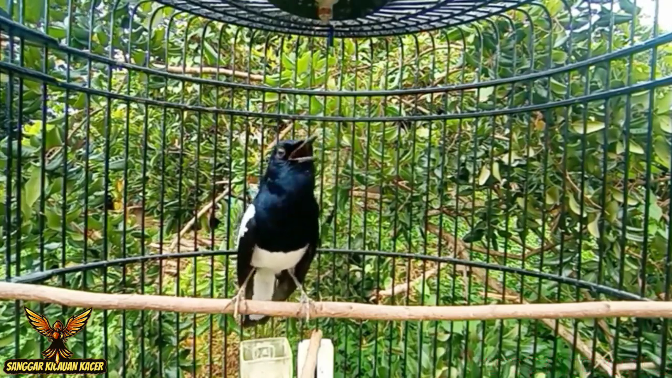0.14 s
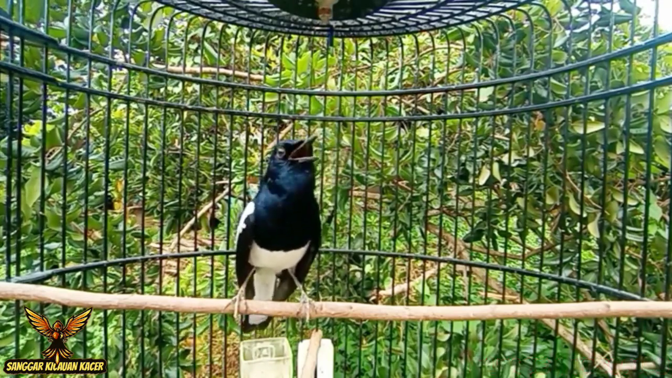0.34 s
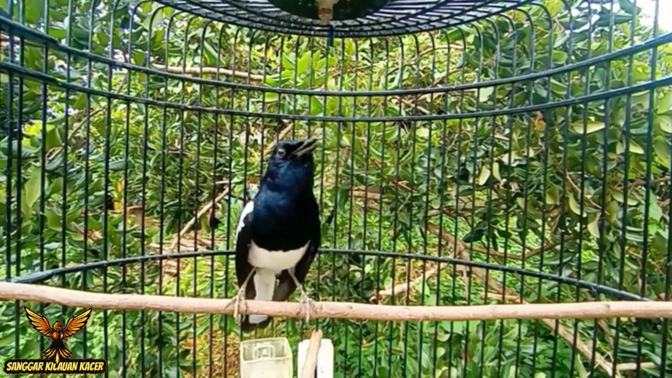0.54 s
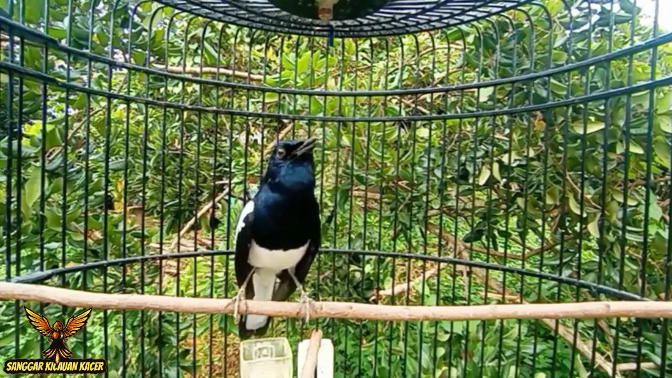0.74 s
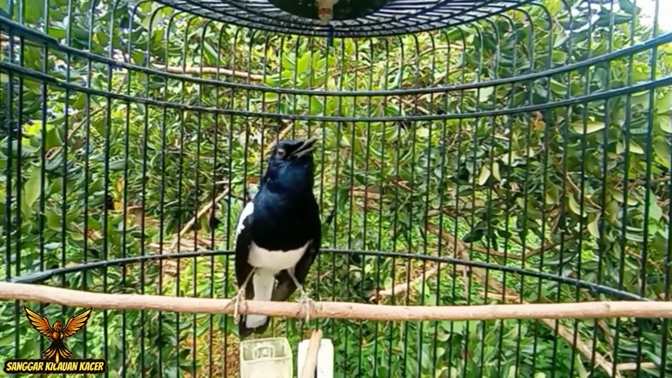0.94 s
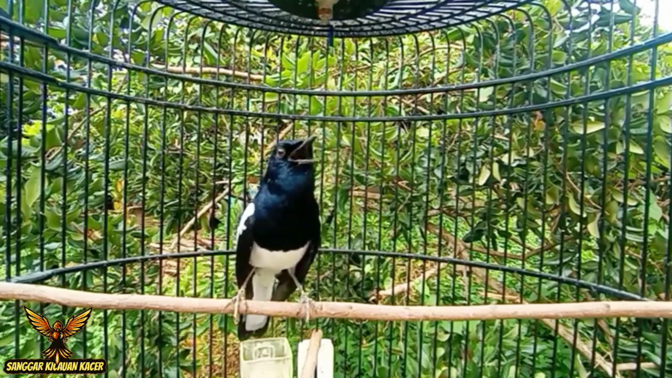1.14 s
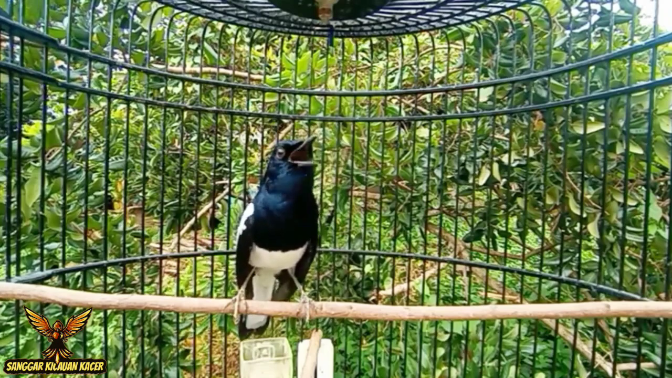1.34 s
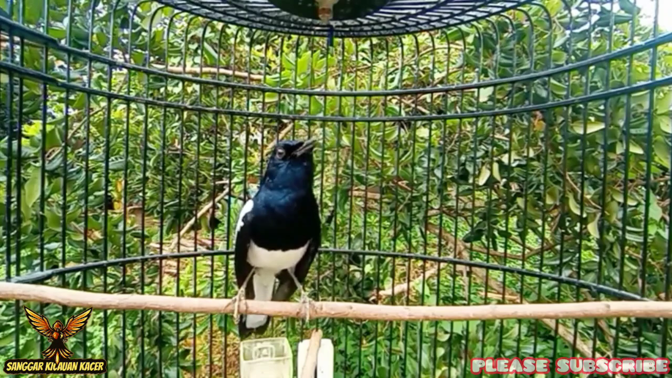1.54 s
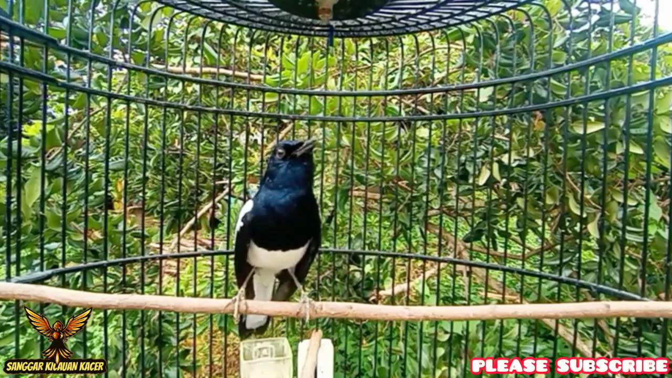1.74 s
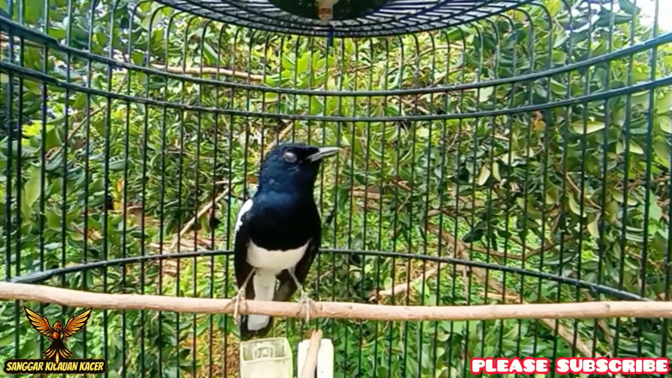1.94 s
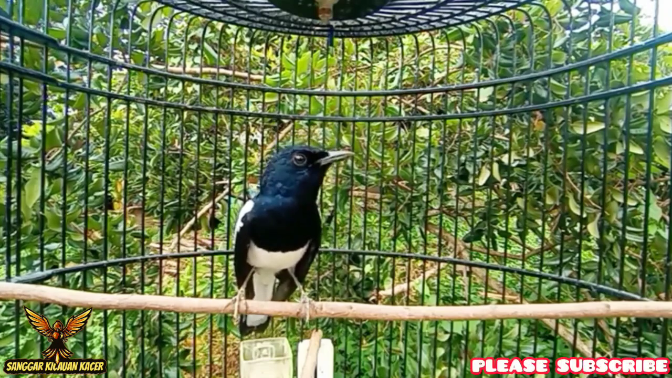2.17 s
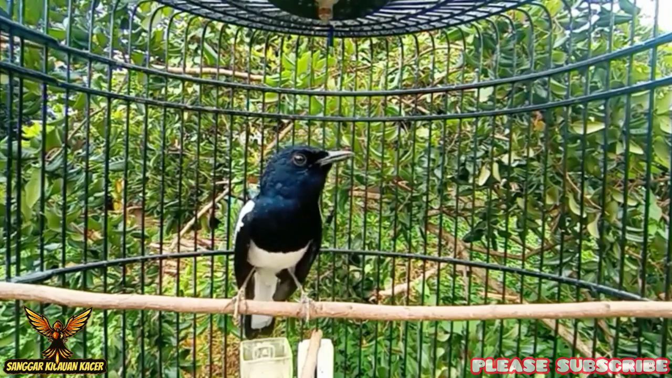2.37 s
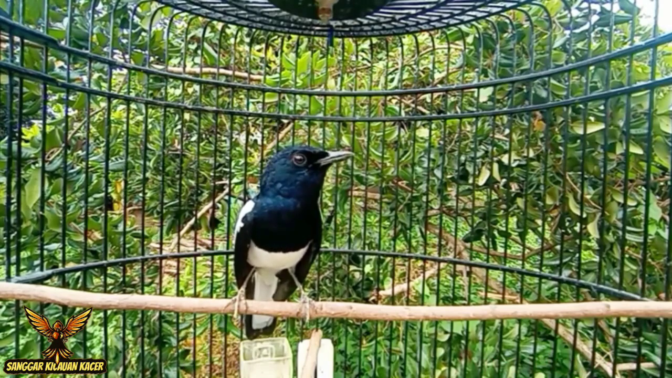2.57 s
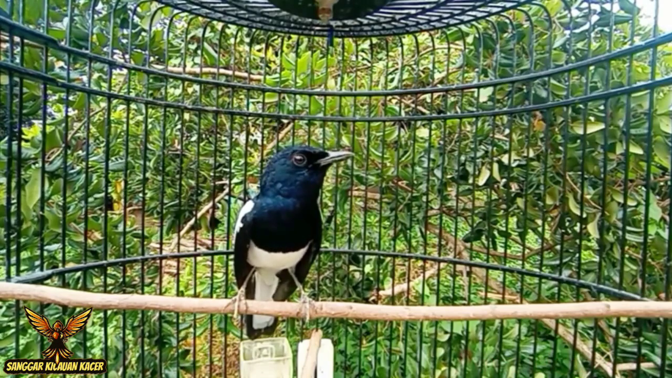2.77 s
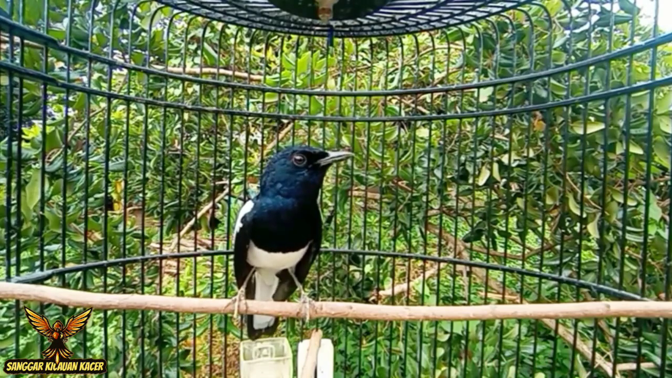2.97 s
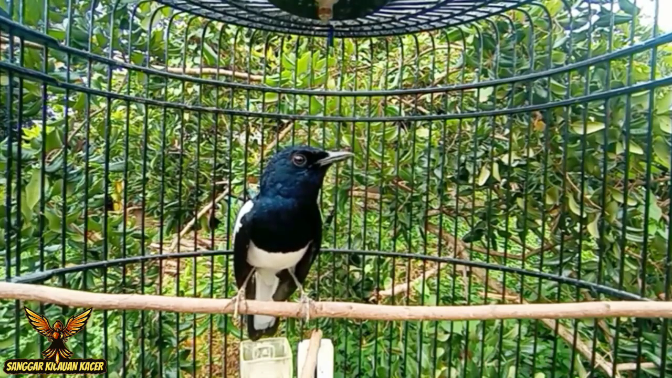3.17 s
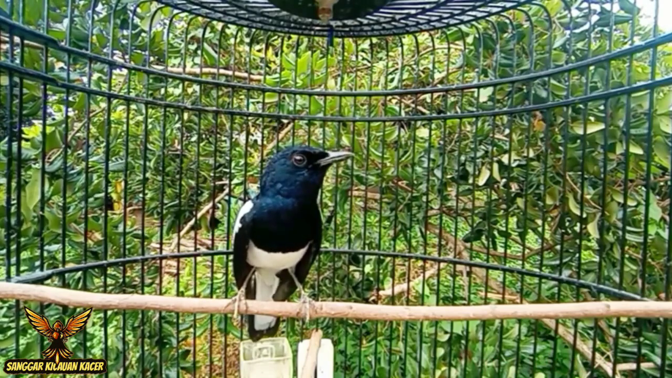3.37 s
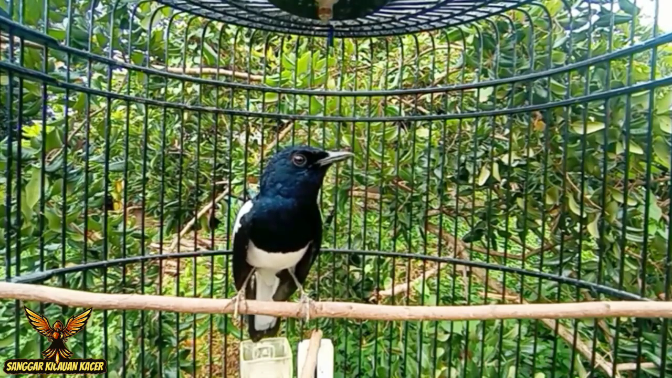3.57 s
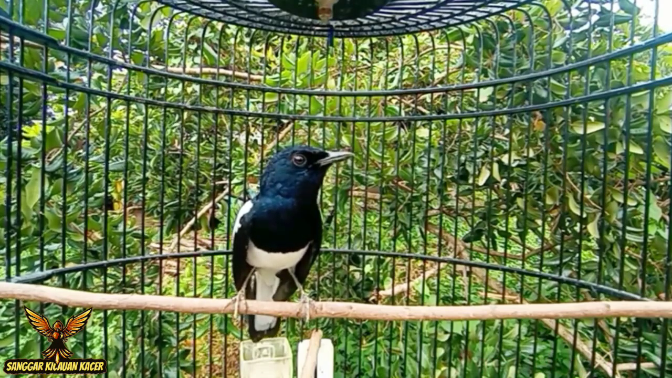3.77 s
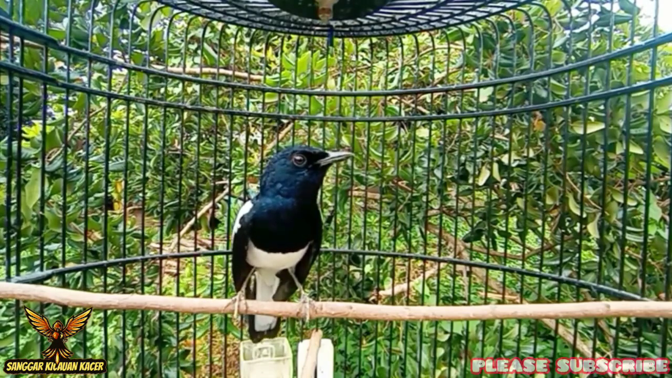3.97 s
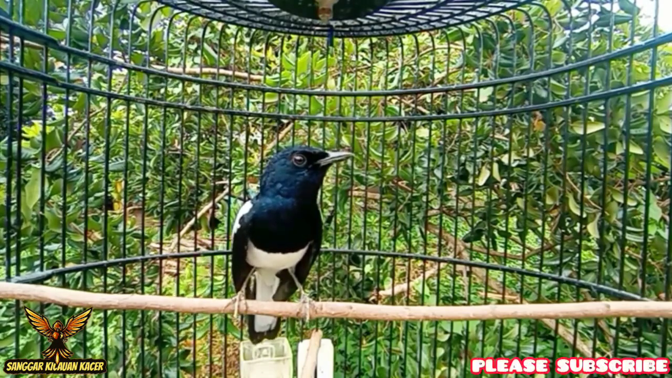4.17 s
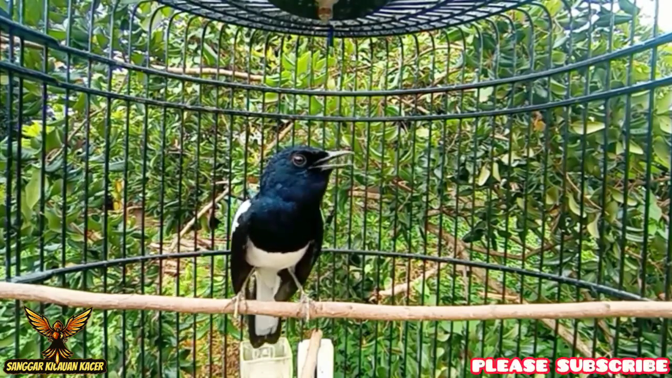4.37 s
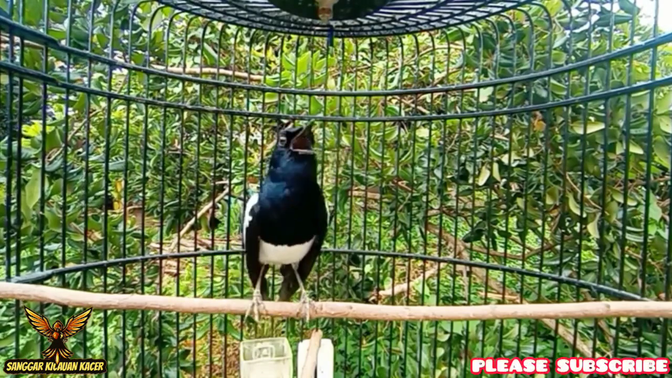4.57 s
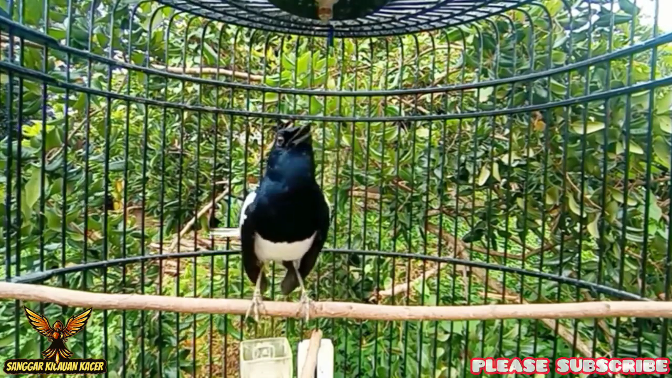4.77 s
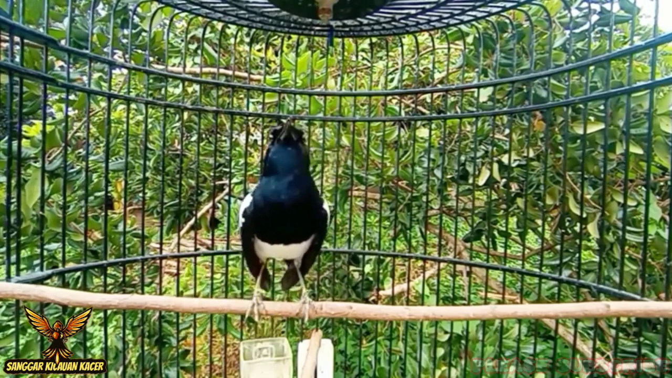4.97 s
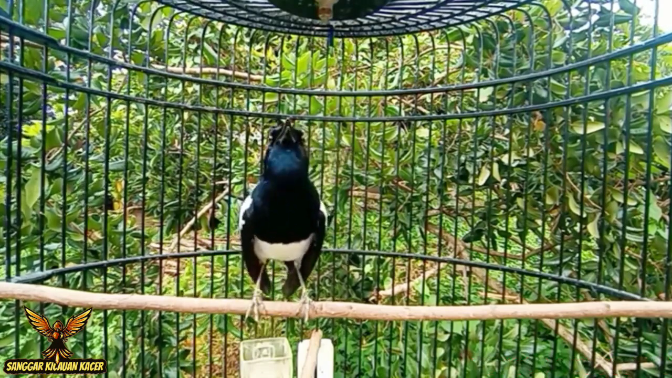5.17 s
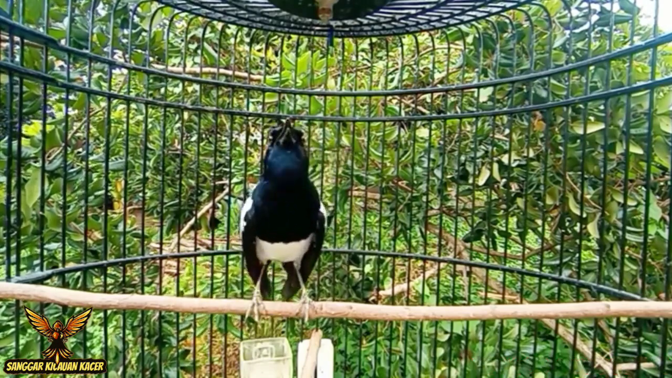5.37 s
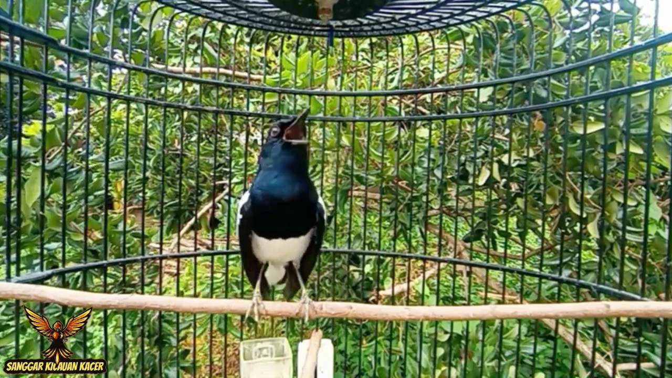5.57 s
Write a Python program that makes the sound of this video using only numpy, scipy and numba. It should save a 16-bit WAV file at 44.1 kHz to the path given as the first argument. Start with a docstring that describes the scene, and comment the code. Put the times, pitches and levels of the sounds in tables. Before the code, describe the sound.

A caged songbird sings loud sliding whistles and raspy chips close by, pausing between two phrases, over faint garden rumble and other birds.

```python
"""A caged songbird sings close to a phone microphone, over a garden's soft rumble and insect-like drone.
It opens with four whistles, the last ending in a trill, and gives a harsh chip just after 2 s.
Then it rests, and other birds are heard answering from further off. From 4.3 s it sings a second,
raspier phrase, and the drone swells briefly. Its voice box (the syrinx) makes the tone and its throat
shapes the overtones. All along, the recorder turns its gain down under the loud notes."""
import sys
import numpy as np
from scipy import signal
from scipy.fft import rfft, irfft, next_fast_len
from scipy.io import wavfile
from scipy.ndimage import uniform_filter1d
from numba import njit

SR = 44100
rng = np.random.default_rng(int(sys.argv[2]) if len(sys.argv) > 2 else 0)


def wrap_up_sound(samples):
    """Save the sound to the file named by the first command line argument, as 16-bit audio."""
    columns = np.atleast_2d(samples).T
    # keep every value between -1 and 1, then stretch to whole-number steps
    tamed = np.clip(columns, -1, 1)
    steps = np.round(tamed * 32767).astype(np.int16)
    wavfile.write(sys.argv[1], SR, steps)


N = 247842

# Tone colour of the garden noise: f/Hz, level/dB
GARDEN_SPECTRUM = [(20, -36.5), (35, -23.5), (50, -18), (90, -3.5), (200, -14), (500, -16.5), (1000, -17.5),
                   (2000, -24.5), (3200, -17.5), (4500, -12.5), (6000, -22.5), (16000, -44.5)]
# How the background rises and falls: t/s, rumble level/dB, drone level/dB
BACKGROUND_LEVELS = [(0, -50.5, -57.5), (0.301, -56, -62), (0.618, -51.5, -58.5), (1.001, -54, -55.5),
                     (1.399, -54, -51), (1.699, -59, -71), (2.102, -60, -70), (2.452, -61, -71),
                     (3.698, -61, -74), (4.15, -61, -78.5), (4.399, -55, -40), (4.801, -57.5, -71),
                     (5.62, -59, -67.5)]
# Ringing bands of the drone: f/Hz, width/Hz, relative level/dB
DRONE_BANDS = [(1287, 160, 3), (2106, 140, -5), (2730, 270, -1), (3203, 810, -6), (4050, 140, -9.5),
               (5640, 70, -17.5), (7100, 70, -20)]
# Gliding calls of far birds; the rows from 2.558 to 2.63 s are overtones riding above the 2.23.2 kHz glide:
# start t/s, end t/s, start f/Hz, end f/Hz, relative level/dB
DISTANT_CALLS = [(1.779, 1.87, 4210, 4135, -65.5), (1.844, 2.026, 4033, 3973, -60.5),
                 (2.491, 2.662, 5480, 3760, -73.5), (2.532, 2.586, 2190, 2196, -67),
                 (2.584, 2.666, 2183, 3200, -66.5), (2.558, 2.589, 6550, 6750, -71),
                 (2.585, 2.61, 6750, 7530, -69.5), (2.589, 2.63, 4540, 5450, -65.5),
                 (2.953, 2.982, 1920, 2500, -60.5), (3.007, 3.166, 2620, 2300, -65.5),
                 (3.188, 3.232, 1720, 2000, -69.5), (3.312, 3.488, 1899, 1880, -67.5),
                 (3.367, 3.414, 3140, 3600, -56), (3.564, 3.624, 4040, 4125, -57.5),
                 (3.606, 3.653, 3710, 3150, -58), (3.792, 3.831, 2927, 3150, -61),
                 (3.826, 3.871, 3113, 4000, -56), (3.871, 3.924, 3930, 3900, -59.5),
                 (3.972, 3.982, 4310, 3150, -53), (4.028, 4.031, 3770, 3140, -54)]
# A second bird nearby, one list for each whistle: t/s, f/Hz, level/dB
NEIGHBOUR_WHISTLES = [
    [(0.145, 4320, -38.5), (0.165, 3810, -31), (0.195, 3850, -34.5), (0.205, 3350, -34),
     (0.215, 3750, -34.5), (0.235, 3280, -32.5)],
    [(0.33, 3070, -25.5), (0.395, 4090, -31), (0.405, 5000, -44.5), (0.415, 5260, -34)],
    [(0.72, 4000, -35.5), (0.755, 3750, -34), (0.79, 3150, -42.5)],
    [(0.9, 2980, -48), (0.93, 3280, -49.5), (0.949, 3890, -40.5), (0.98, 4020, -51.5)],
    [(2.655, 3362, -46.5), (2.84, 3322, -42), (2.86, 3370, -50.5)],
    [(3.241, 2530, -41.5), (3.26, 2290, -47), (3.283, 2230, -48), (3.312, 2520, -45.5), (3.33, 2894, -43),
     (3.343, 2714, -47.5), (3.354, 3082, -43.5), (3.542, 3045, -42.5), (3.57, 3040, -47.5)],
    [(3.625, 2750, -48.5), (3.669, 2510, -43), (3.82, 2170, -55.5)],
    [(3.83, 1770, -59.5), (3.85, 2263, -46), (3.92, 2307, -45.5), (3.986, 2016, -52), (4.0, 2010, -71)],
    [(4.163, 4050, -54), (4.206, 3910, -40), (4.219, 3050, -47), (4.23, 3290, -38.5), (4.243, 2970, -61.5)],
    [(4.39, 3080, -31), (4.423, 3680, -31.5), (4.452, 4130, -26.5)],
]
# The tops of quick up-and-down flicks in pitch: t/s, f/Hz, level/dB
FLICK_TOPS = [(0.489, 4680, -35), (0.536, 3910, -37.5), (4.558, 4426, -27.5), (4.607, 3640, -31.5)]
# Two short low tones under the second phrase, one list each: t/s, f/Hz, level/dB
LOW_WHISTLES = [
    [(4.325, 1133, -43), (4.39, 1112, -32)],
    [(4.43, 729, -43), (4.485, 697, -53)],
]
# The songbird's harsh moments: start t/s, length/s, air level/dB, shake/share of pitch
HARSH_MOMENTS = [(0.009, 0.034, -43, 0.024), (0.064, 0.15, -56, 0.0068), (1.236, 0.073, -52, 0.024),
                 (2.167, 0.064, -34.5, 0.081), (2.236, 0.0827, -18, 0.041), (2.953, 0.063, -47.5, 0.022),
                 (4.269, 0.066, -26.5, 0.12), (4.711, 0.11, -26.5, 0.024), (4.957, 0.033, -27, 0.097),
                 (5.207, 0.079, -35, 0.023), (5.554, 0.064, -63, 0.0096), (5.578, 0.018, -29.5, 0.021)]
# Tone colour of its raspy air: f/Hz, level/dB
RASP_SPECTRUM = [(600, -32), (1000, -24.5), (1500, -5), (2700, 6.5), (4000, -1), (7000, -13), (8500, -48),
                 (9600, -32.5), (11500, -22), (13000, -32.5), (15000, -20.5), (15800, -25)]
# Trills, runs of quick dips in pitch: start t/s, end t/s, dips per second, exponent of the swell,
# then at the deepest dip: pitch drop/Hz, base tone change/dB, overtone change/dB
TRILL_DIPS = [(1.16, 1.271, 54, 1.1, 720, -17, -4), (1.271, 1.308, 80, .6, 260, -3, 0),
              (2.164, 2.226, 67, .4, 1000, -9, -3), (2.244, 2.3, 57, .6, 400, 4, 8)]
# How often the syrinx slips shut, faster and then slower: t/s, slips per second
SLIP_RATES = [(5.2158, 180), (5.23, 215), (5.242, 305), (5.2535, 140), (5.267, 118)]
# Tone colour of harmonics 3 and up (harmonic k sounds at k times the pitch): f/Hz, level/dB
UPPER_SPECTRUM = [(3500, 26.5), (5000, 3), (7000, -7), (8200, -14.5), (9200, 1.5), (10300, -3), (11500, -3),
                  (13000, -13.5), (14800, -13), (16000, -16.5)]
# Strength of harmonics 3 to 9 at the syrinx: relative level/dB
HARMONIC_LEVELS = [-4.5, 1.5, -7.5, -7, -7, -9.5, -5]
# The song, one entry a note; the two sides of the syrinx overlap in the harsh chip. Columns:
# second harmonic level/dB and upper harmonics level/dB (both relative, at start, middle and end),
# then the note's path: t/s, f/Hz, level/dB at the syrinx
SONG_NOTES = [ ((-6, -2.5, -20.5), (-25, -21, -8), [(0.002, 3376, 4.5), (0.01, 3140, -4),
              (0.028, 3133, -17.5), (0.046, 3430, 3), (0.06, 3240, 8), (0.083, 3106, 7), (0.098, 2920, 0.5),
              (0.115, 2858, 4), (0.123, 2740, 1.5), (0.131, 2520, -20.5)]), ((-5, -14, -15),
              (-12.5, -10.5, -6.5), [(0.232, 3054, -24), (0.259, 2776, -3.5), (0.303, 2697, 4.5),
              (0.434, 2428, -6.5), (0.47, 2376, -9.5), (0.48, 2498, -10), (0.492, 2350, -14.5)]),
              ((-19.5, -22, -11), (-15.5, -12, -2), [(0.652, 1972, -26.5), (0.666, 1988, -5),
              (0.692, 1946, 5), (0.746, 1918, 6), (0.846, 2094, 7.5), (0.869, 2258, -2.5),
              (0.887, 2296, -1), (0.897, 2295, -14.5)]), ((-10, -11, -11), (-13, -9.5, -13.5),
              [(0.984, 2930, -32.5), (0.994, 2738, -11), (1.011, 2749, 0), (1.058, 2700, 4.5),
              (1.13, 2750, 5), (1.141, 2784, 8), (1.146, 2685, 4), (1.16, 2652, 5.5), (1.2, 2752, -2),
              (1.236, 2836, -4.5), (1.253, 3163, -6.5), (1.28, 3175, -5.5), (1.3, 3353, -8),
              (1.309, 3033, -15.5)]), ((-3, -12, -13), (-39, -23.5, -27.5), [(2.165, 1298, -40.5),
              (2.178, 1917, -30), (2.197, 1934, -24), (2.208, 2240, -27)]), ((-14.5, -12, -1.5),
              (-30, -29, -18), [(2.174, 3003, -27.5), (2.196, 3150, -20.5), (2.211, 3650, -13),
              (2.226, 2850, -28.5), (2.232, 2610, -19), (2.243, 2713, -13.5), (2.252, 1778, -19),
              (2.26, 1823, -21.5), (2.282, 1776, -11), (2.299, 1440, -9), (2.314, 1244, -29.5)]),
              ((-20, -29.5, -36.5), (-35, -44, -42), [(2.375, 1364, -65.5), (2.382, 1440, -44),
              (2.402, 1644, -33.5), (2.418, 1576, -35), (2.433, 1174, -44), (2.445, 1250, -56)]),
              ((-2, -0.59, -0.15), (-15, -9, -5.5), [(4.28, 1239, -28), (4.296, 1292, -17.5),
              (4.309, 1330, -6), (4.317, 2130, -4), (4.332, 2320, -15.5), (4.372, 2369, 0),
              (4.438, 2316, -0.5), (4.457, 2427, -7), (4.468, 2494, -2.5), (4.53, 2804, 0.5),
              (4.552, 2868, 1), (4.56, 2760, -4), (4.568, 2540, -36)]), ((-2, -5.5, -7), (-17, -13, -16),
              [(4.712, 1283, -23), (4.723, 1762, -22), (4.731, 1226, -14.5), (4.736, 1908, -12),
              (4.742, 3090, -2.5), (4.747, 3686, -5.5), (4.755, 2587, 0.5), (4.774, 1843, -5),
              (4.79, 1734, -1), (4.795, 1780, -17), (4.799, 1563, -3), (4.822, 1543, -40)]),
              ((-5.5, -10.5, -13), (-23, -4, -5), [(4.951, 2370, -36.5), (4.968, 2043, -11),
              (4.98, 1936, -26), (4.987, 2855, -4), (4.991, 2840, -8), (4.997, 2820, 3),
              (5.017, 2964, -1.5), (5.032, 2786, -11), (5.049, 2756, 1), (5.062, 2285, 2),
              (5.085, 2295, -0.5), (5.098, 2400, -2), (5.147, 2350, -9), (5.163, 2246, -23)]),
              ((-11, -3.5, -8), (-22, -3.7, -2.1), [(5.178, 2190, -24), (5.205, 2072, -8),
              (5.228, 2083, -4), (5.241, 2100, -3.5), (5.253, 2324, -0.5), (5.298, 2270, 3),
              (5.343, 2362, 2.5), (5.35, 2090, -14.5), (5.358, 2000, -14.5)]), ((-1.5, -12.5, 0),
              (-17, 5.5, -17.5), [(5.471, 3880, -49), (5.475, 3580, -17), (5.483, 3653, 0),
              (5.507, 3791, 10.5), (5.547, 3748, 14.5), (5.57, 3430, 7.5), (5.573, 3490, -0.5),
              (5.581, 3230, 0.5)]), ((11, 0, 0), (1.5, 0, -31), [(5.592, 3341, -4.5), (5.6, 3215, -11),
              (5.618, 3347, 10)]), ]


def amp(db):
    """Turn decibels into a plain multiplier."""
    return 10 ** (np.asarray(db) / 20)


def rms_one(x):
    """Scale a signal so that its average power is 1."""
    return x / np.sqrt(np.mean(x ** 2) + 1e-20)


def level_at(spectrum, hz):
    """Look up a spectrum's level in dB at any frequency."""
    table_hz, table_db = np.transpose(spectrum)
    return np.interp(np.log(hz), np.log(table_hz), table_db)


def filtered(x, hz, kind):
    """Gently keep the "low" part, the "high" part or a "band" of a sound."""
    return signal.sosfilt(signal.butter(2, hz, kind, fs=SR, output="sos"), x)


def coloured_noise(spectrum):
    """Noise with the given tone colour."""
    size = next_fast_len(N)
    hz = np.maximum(np.arange(size // 2 + 1) * SR / size, 1)
    shaped = rfft(rng.standard_normal(size)) * amp(level_at(spectrum, hz))
    return rms_one(irfft(shaped, size)[:N])


def drift(rate_hz):
    """A smooth random wobble of typical size 1; a higher rate moves faster."""
    pole = np.exp(-2 * np.pi * rate_hz / SR)
    return rms_one(signal.lfilter([1], [1, -2 * pole, pole ** 2], rng.standard_normal(N + SR))[SR:])


def note_curves(rows, fade_s):
    """A note's sample positions, its fade in and out, and its smoothed pitch and level."""
    times, *columns = np.transpose(rows)
    at = np.arange(max(round((times[0] - fade_s) * SR), 0), min(round((times[-1] + fade_s) * SR), N))
    t = at / SR
    fade = np.clip(np.minimum(t - times[0], times[-1] - t) / fade_s + 1, 0, 1)
    return at, fade, [uniform_filter1d(np.interp(t, times, c), size=60, mode="nearest") for c in columns]


def insect_drone():
    """Noise rings in narrow bands, each slowly growing louder and softer."""
    drone = np.zeros(N)
    for hz, width_hz, level_db in DRONE_BANDS:
        radius = np.exp(-np.pi * width_hz / SR)
        resonance = [1, -2 * radius * np.cos(2 * np.pi * hz / SR), radius ** 2]
        band = signal.lfilter([1, 0, -1], resonance, rng.standard_normal(N))
        band = signal.lfilter([1], resonance, band)
        drone += amp(level_db + 2 * drift(1.1)) * rms_one(band)
    return drone


def garden():
    """One noise is split into low rumble, middle rustle and high hiss; the drone is added."""
    times, *columns = np.transpose(BACKGROUND_LEVELS)
    rumble_db, drone_db = [np.interp(np.arange(N) / SR, times, c) for c in columns]
    rustle_db = -61.5 + 1.67 * (rumble_db - rumble_db.mean())   # swings wider than the rumble
    air = coloured_noise(GARDEN_SPECTRUM)
    gust_db = 2.4 * drift(6)
    rumble = amp(rumble_db + gust_db) * rms_one(filtered(air, 400, "low"))
    rustle = amp(rustle_db + gust_db) * rms_one(filtered(air, [220, 2000], "band"))
    hiss = amp(-68.5) * rms_one(filtered(air, 2000, "high"))
    return rumble + rustle + hiss + amp(drone_db) * insect_drone()


def echoes(x, decay_s=.33, build_s=.0065):
    """Sound bounces off walls and leaves as a dying tail; the leaves swallow the treble."""
    t = np.arange(SR) / SR
    tail = rng.standard_normal(SR) * amp(-60 * t / decay_s) * np.clip(t / build_s, 0, 1)
    tail = filtered(tail, 6600, "low")
    return signal.fftconvolve(x, tail / np.sqrt(np.sum(tail ** 2)))[:N]


def whistle(rows, octave_db, waver):
    """A wavering, almost pure tone with faint overtones."""
    at, fade, (hz, level_db) = note_curves(rows, fade_s=.004)
    phase = 2 * np.pi * np.cumsum(hz * (1 + waver[at])) / SR
    upper = amp(-19) * sum(np.sin(k * phase) * (k * hz < 11000) for k in (3, 4))
    overtones = amp(octave_db) * (np.sin(2 * phase) + upper)
    return at, np.sqrt(2) * amp(level_db) * fade * (np.sin(phase) + overtones)


def other_birds():
    """Nearby whistles and flicks, and far calls that waver more in pitch and loudness."""
    nearby, distant = np.zeros((2, N))
    waver = drift(90)
    flicks = [[(t - .010, min(3100, hz), db - 6), (t, hz, db), (t + .014, 2850, db)]
              for t, hz, db in FLICK_TOPS]
    for rows in NEIGHBOUR_WHISTLES + flicks + LOW_WHISTLES:
        at, wave = whistle(rows, octave_db=-25.5, waver=.003 * waver)
        nearby[at] += wave
    for start, end, start_hz, end_hz, db in DISTANT_CALLS:
        at, wave = whistle([(start, start_hz, db), (end, end_hz, db)], octave_db=-45, waver=.009 * waver)
        distant[at] += wave
    return nearby * amp(.8 * drift(30)), distant * amp(3 * drift(80))


def harshness():
    """In each harsh moment, the songbird's air noise and pitch shake swell and fade."""
    air_gain, shake = np.zeros((2, N))
    for start, length, air_db, pitch_share in HARSH_MOMENTS:
        at = np.arange(round(start * SR), round((start + length) * SR))
        swell = np.sin(np.pi * np.linspace(0, 1, len(at)) ** 1.3) ** 2
        air_gain[at] = amp(air_db) * swell
        shake[at] = pitch_share * np.sqrt(swell)
    return air_gain, shake


def rasp(air_gain):
    """Air rushes unevenly through the songbird's throat."""
    return air_gain * amp(2.5 * drift(120)) * coloured_noise(RASP_SPECTRUM)


def trill(t):
    """Quick pitch dips and their level changes, for the trills that end within a note."""
    changes = np.zeros((3, len(t)))
    for start, end, rate, exponent, *deepest in TRILL_DIPS:
        if t[0] < end < t[-1]:
            swell = np.abs(np.sin(np.pi * np.clip((t - start) / (end - start), 0, 1))) ** exponent
            dips = np.sin(np.pi * (rate * (t - start) % 1) ** 1.4) ** 2   # slow fall, quick return
            changes += np.outer(deepest, swell * dips)
    return changes


def syrinx_slips(shut_s=.0006, settle_s=.0014, depth=.63):
    """The syrinx slips shut, so the level dips, then snaps open at a briefly higher pitch."""
    times, rates = np.transpose(SLIP_RATES)
    rate = np.interp(np.arange(N) / SR, times, rates, left=0, right=0)
    slips = np.diff(np.ceil(np.cumsum(rate) / SR), prepend=0)   # a 1 at every slip
    t = np.arange(-SR // 100, SR // 100 + 1) / SR
    shut = np.exp(-(t / shut_s) ** 2)
    kick_hz = 200 * (1 + np.tanh(t / shut_s)) * np.exp(-np.abs(t) / settle_s)
    return 1 - depth * signal.fftconvolve(slips, shut, "same"), signal.fftconvolve(slips, kick_hz, "same")


THROAT_HZ, THROAT_WIDTH_HZ, THROAT_LEAK_DB = 2754, 546, -27.5
TREBLE_LIMIT_HZ = 15800


def throat(hz):
    """The hollow throat passes tones near its own pitch and lets only a little of the rest leak out."""
    resonance = 1 / (1 + ((hz - THROAT_HZ) / THROAT_WIDTH_HZ) ** 2)
    return np.hypot(resonance, amp(THROAT_LEAK_DB))


def songbird(shake, bloom_db=-25.5, bloom_s=.012):
    """The vibrating syrinx makes a base tone and overtones, and the throat shapes their strength."""
    song = np.zeros(N)
    slip_gain, kick_hz = syrinx_slips()
    waver, flutter, swell = drift(120), drift(300), drift(8)
    orders = np.arange(3, 10)[:, None]
    for second_levels, upper_levels, path in SONG_NOTES:
        at, fade, (hz, source) = note_curves([(t, hz, amp(db)) for t, hz, db in path], fade_s=.0027)
        source_db = 20 * np.log10(source)
        dip_hz, base_db, overtone_db = trill(at / SR)
        overtone_db += bloom_db * np.exp(-(at - at[0]) / SR / bloom_s)   # overtones start weak
        start_middle_end = [at[0], at.mean(), at[-1]]
        # Overtones follow only part of the base tone's rise and fall.
        second_db = np.interp(at, start_middle_end, second_levels) + .56 * source_db + overtone_db
        upper_db = np.interp(at, start_middle_end, upper_levels) + .59 * source_db + overtone_db
        upper_db += 3 * np.log2(THROAT_HZ / hz)   # lower notes are brighter
        upper_db += THROAT_LEAK_DB + 1.1 * flutter[at]
        hz = (hz - dip_hz) * (1 + .003 * waver[at] + shake[at] * flutter[at]) + kick_hz[at]
        phase = 2 * np.pi * np.cumsum(hz) / SR
        weights = amp(level_at(UPPER_SPECTRUM, orders * hz) + np.c_[HARMONIC_LEVELS])
        weights *= orders * hz < TREBLE_LIMIT_HZ
        weights *= amp(2.5 * swell[(at + orders * SR // 2) % N])   # each swells and fades on its own
        base = amp(source_db + base_db) * throat(hz) * np.sin(phase)
        second = amp(second_db) * throat(2 * hz) * np.sin(2 * phase)
        upper = amp(upper_db) * np.sum(weights * np.sin(orders * phase), axis=0)
        loudness = np.sqrt(2) * fade * slip_gain[at] * amp(.22 * waver[at - SR // 2])
        song[at] += loudness * (base + second + upper)
    return song


def scene():
    """Mix the garden, the echoes, the other birds and the songbird into one channel."""
    air_gain, shake = harshness()
    singer = songbird(shake) + rasp(air_gain)
    nearby, distant = other_birds()
    echo = echoes(amp(-34.5) * singer + amp(-18) * nearby + distant)   # far birds echo the most
    return (garden() + echo + amp(8) * distant + nearby + singer)[None]


@njit
def gain_control(x, threshold_db, strength, average_s):
    """The recorder turns itself down as its average output rises above a threshold."""
    out, power = np.zeros(len(x)), 1e-12
    for i in range(len(x)):
        excess_db = max(10 * np.log10(power) - threshold_db, 0.)
        out[i] = x[i] * 10 ** (-strength * excess_db / 20)
        power += (out[i] ** 2 - power) / (average_s * SR)
    return out


def record(dry):
    """The phone evens out the loudness, then cuts off the highest treble."""
    evened = gain_control(dry[0] + 1e-9, threshold_db=-35, strength=.62, average_s=.03)
    return signal.sosfilt(signal.cheby2(22, 60, TREBLE_LIMIT_HZ, fs=SR, output="sos"), evened)[None]


dry = scene()
out = record(dry)
wrap_up_sound(out)
```